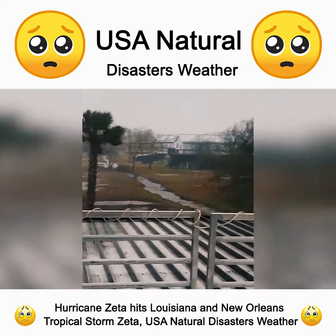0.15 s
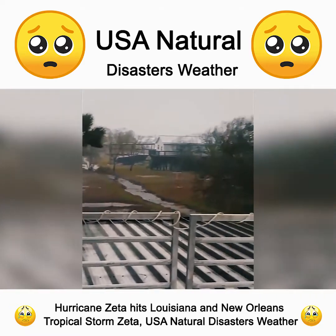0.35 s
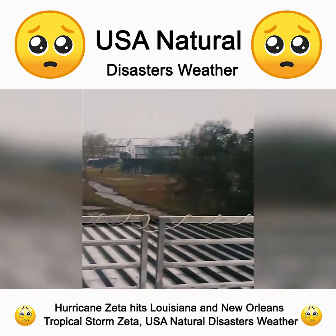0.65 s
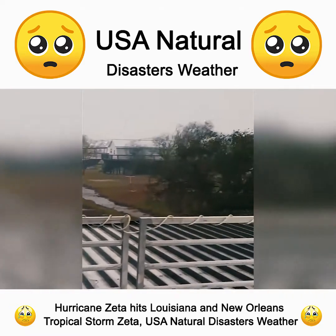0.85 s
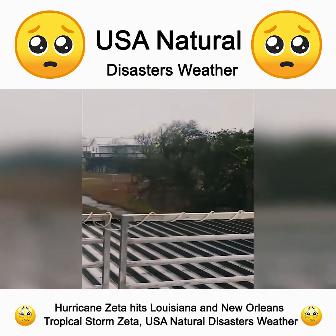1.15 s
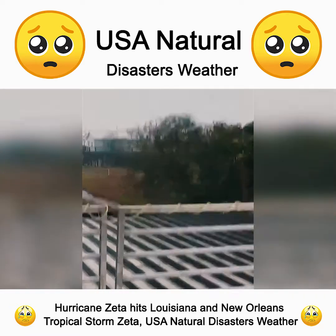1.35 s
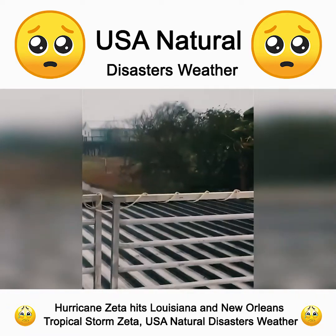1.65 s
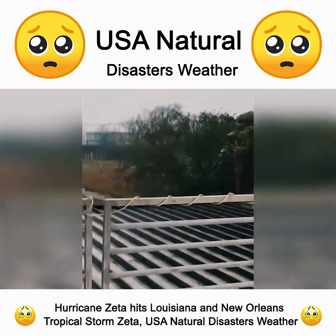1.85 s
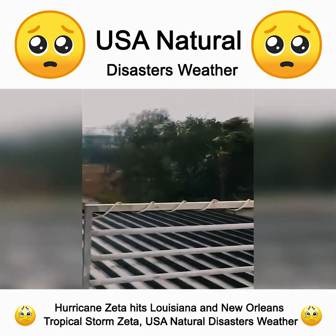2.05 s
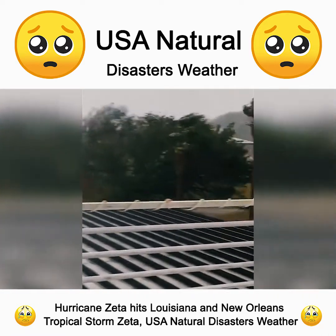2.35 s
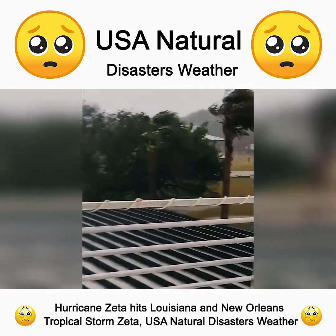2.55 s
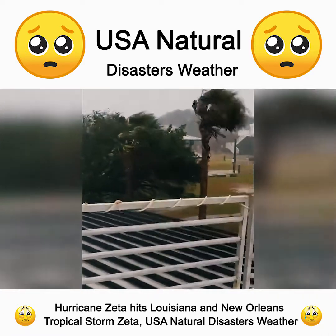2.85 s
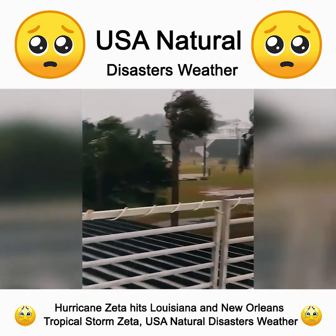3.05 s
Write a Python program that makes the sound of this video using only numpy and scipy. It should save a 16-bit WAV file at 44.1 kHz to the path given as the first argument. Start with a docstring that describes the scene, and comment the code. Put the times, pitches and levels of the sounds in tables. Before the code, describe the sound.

Strong storm wind on an open deck roars into a phone microphone with low rumble and dense buffets; one sharp, loud knock lands early, then the wind eases to a lull and surges again.

```python
"""Storm wind on an open deck, heard through a phone: broad coloured noise roars over a faint hiss of trees.
At first a low rumble of turbulence and a crowd of hard buffets, short puffs of noise, hit the microphone.
Among them, at 0.22 s, one sharp knock close by drops at once from a click into a low thud.
A very faint trace of high noise comes and goes around 0.23 s.
The roar then eases to a lull near 2 s, with fewer buffets, and swells again to its strongest at the end."""
import sys
import numpy as np
from scipy import signal
from scipy.fft import rfft, irfft
from scipy.io import wavfile
from scipy.ndimage import uniform_filter1d

SR = 44100
rng = np.random.default_rng(int(sys.argv[2]) if len(sys.argv) > 2 else 0)


def to_wav(s):
    """Save 16-bit WAV."""
    ch = np.atleast_2d(s).T  # columns
    pcm = np.round(np.clip(ch, -1, 1) * 32767)  # PCM
    wavfile.write(sys.argv[1], SR, pcm.astype(np.int16))


N = 141120  # samples: 3.2 s
TIME_S = np.arange(N) / SR
FREQ_HZ = np.fft.rfftfreq(N, 1 / SR)


def undb(db):
    """Decibels to gain."""
    return 10 ** (np.asarray(db) / 20)


def level_over_time(rows):
    """Gain at every sample, in straight dB lines between (t/s, level/dB) points."""
    time_s, level_db = np.array(rows, float).T
    return undb(np.interp(TIME_S, time_s, level_db))


def over_pitch(rows):
    """Value at every frequency, in straight lines over log pitch between (f/Hz, value) points."""
    hz, value = np.array(rows, float).T
    return np.interp(np.log(np.maximum(FREQ_HZ, 1)), np.log(hz), value)


def noise(gain):
    """Noise of rms 1, shaped by a gain per frequency."""
    x = irfft(rfft(rng.standard_normal(N)) * gain, N)
    return x / x.std()


def flutter(rate_hz, depth_db):
    """A gain that wanders at random by an rms depth in dB, weakening smoothly above the rate."""
    return undb(depth_db * noise(1 / (1 + (FREQ_HZ / rate_hz) ** 2)))


def burst(x, at_s, length_s):
    """A bell-shaped piece of x, scaled to a bell-weighted rms of 1 before shaping."""
    bell = np.exp(-2 * ((TIME_S - at_s) / length_s) ** 2)
    return x * bell * np.sqrt(np.sum(bell ** 2) / np.sum((x * bell) ** 2))


# likeness of left and right: [f/Hz, coherence, phase by which left leads/rad]
STEREO_LIKENESS = [(540,1,0),(740,.99,0),(900,.88,-.15),(1050,.62,-.1),(1170,.35,.6),(1300,.45,2.1),(1550,.6,2.7),(1900,.72,2.9),(2500,.7,3.0),(2900,.4,2.6),(3400,.3,1.3),(4400,.6,.3),(5400,.95,0)]


def wide_noise(colour):
    """Stereo noise of rms 1: alike in the bass, partly opposed in the upper middle."""
    gain = undb(over_pitch(colour))
    likeness = np.array(STEREO_LIKENESS)
    coherence = np.clip(over_pitch(likeness[:, [0, 1]]), -1, 1)
    lead = over_pitch(likeness[:, [0, 2]])
    # the sum and difference of two independent noises set the coherence
    shared = rfft(rng.standard_normal(N)) * gain * np.sqrt(1 + coherence)
    apart = rfft(rng.standard_normal(N)) * gain * np.sqrt(1 - coherence)
    left = (shared + apart) * np.exp(.5j * lead)
    right = (shared - apart) * np.exp(-.5j * lead)
    x = irfft(np.array([left, right]), N)
    return x / x.std()


# strength of the roar's body, before the overall lift: [t/s, level/dB]
GUST_BODY = [(0,-43.5),(.4,-44),(.7,-47.5),(.92,-45.5),(1.15,-45),(1.5,-46),(1.85,-48),(2.04,-48.5),(2.25,-39),(2.55,-37),(2.85,-37),(3.2,-33.5)]
# strength of the roar's treble, before the overall lift: [t/s, level/dB]
GUST_TREBLE = [(0,-40),(.4,-42.5),(.7,-45),(1.2,-43.3),(1.48,-47.5),(1.6,-45.5),(1.83,-49.5),(2.03,-47.5),(2.2,-44),(2.4,-44.5),(2.55,-39),(2.76,-38),(2.88,-40.5),(3.05,-37.5),(3.2,-38)]
# relative colour of the rushing air: [f/Hz, level/dB per Hz]
ROAR_COLOUR = [(40,-25.5),(90,-13),(150,-1.5),(230,-3.5),(330,0),(470,-3),(650,-3),(800,-4),(1100,-5.3),(1500,-9.5),(1900,-16),(2400,-48),(3500,-63.5),(6000,-78.5),(10000,-100.5)]
ROAR_LIFT_DB = 5.5
ROAR_FLUTTER_HZ, ROAR_FLUTTER_DB = 44.4, 0.74
WAVER_HZ, WAVER_DB = 4.2, 1.5  # slow wandering of each half-octave alone


def roar():
    """The broad rush of air follows the gust and flutters; its half-octaves swell and sink separately."""
    spectrum = rfft(wide_noise(ROAR_COLOUR))
    # half-octave steps up from 100 Hz; the end bands also take all that lies beyond them
    step = np.clip(2 * np.log2(np.maximum(FREQ_HZ, 1) / 100), 0, 8)
    body, treble = level_over_time(GUST_BODY), level_over_time(GUST_TREBLE)
    air = 0
    for k in range(9):
        treble_share = np.clip((k - 3) / 4, 0, 1)
        overlap = np.maximum(1 - abs(step - k), 0)
        band = irfft(spectrum * overlap, N)
        strength = body ** (1 - treble_share) * treble ** treble_share
        air = air + band * strength * flutter(WAVER_HZ, WAVER_DB)
    return air * undb(ROAR_LIFT_DB) * flutter(ROAR_FLUTTER_HZ, ROAR_FLUTTER_DB)


# eddies that strike the microphone: [centre t/s, length t/s, level/dB, upper edge f/Hz]
EDDY_HITS = [(.022,0.018,-37,200),(0.042,0.0057,-23.5,736),(.053,.0058,-35,400),(0.105,0.022,-21,480),(.17,0.022,-30,450),(0.207,0.0076,-26,300),(0.292,0.012,-28,447),(0.324,0.015,-22.5,650),(0.337,0.0095,-20.5,200),(0.344,0.0023,-21.5,850),(.35,0.0041,-22,250),(0.362,0.0039,-30,750),(0.38,.01,-30.5,450),(0.395,0.0061,-21,800),(0.427,0.0095,-22,600),(0.517,0.034,-27.5,129),(.551,0.025,-31,656),(0.613,0.014,-28.5,860),(0.635,0.012,-34,120),(0.703,0.009,-27,200),(0.744,0.023,-37,130),(0.788,0.016,-33,110),(0.842,0.02,-29,120),(.981,0.0047,-24,800),(1.123,.007,-28,1290),(1.214,0.01,-33.5,400),(1.263,0.012,-27,400),(1.515,0.042,-35.5,330),(1.769,0.015,-36,160),(2.146,0.018,-40,500),(2.278,0.04,-35.5,400),(2.423,0.017,-23,550),(2.694,.018,-28,146),(2.996,0.018,-24.5,283),(3.08,0.032,-31.5,300),(3.141,.03,-27,260)]
# relative colour of an eddy, before its upper edge is rolled off: [f/Hz, level/dB per Hz]
EDDY_COLOUR = [(25,-25),(45,-8),(70,3.5),(110,4),(155,2),(220,-3.5),(400,-6),(1000,-9.5),(1500,-23),(3000,-60.5)]


def buffets():
    """Each eddy striking the microphone is a short puff of noise, dulled above its own upper edge."""
    colour = undb(over_pitch(EDDY_COLOUR))
    out = 0
    for at_s, length_s, level_db, edge_hz in EDDY_HITS:
        below_edge = 1 / np.sqrt(1 + (FREQ_HZ / edge_hz) ** 6)
        puff = burst(noise(colour * below_edge), at_s, length_s)
        out = out + undb(level_db) * puff
    return out


# strength of the turbulence on the microphone: [t/s, level/dB]
RUMBLE_LEVEL = [(0,-24.5),(.15,-37),(.27,-34.5),(.36,-29),(.52,-38),(.66,-41),(.82,-39.5),(.9,-42),(1.2,-38.5),(1.4,-45.5),(1.55,-42.5),(1.85,-47.5),(2.05,-49.5),(2.3,-41.5),(2.55,-40.5),(2.85,-34.5),(3.2,-34.5)]
# relative colour of the turbulence: [f/Hz, level/dB per Hz]
RUMBLE_TONE = [(20,-25.5),(35,-14.5),(55,7),(80,-0.5),(120,-0.5),(170,-3.5),(280,-9),(500,-18.5),(1000,-37),(2000,-77),(6000,-100)]
RUMBLE_FLUTTER_HZ, RUMBLE_FLUTTER_DB = 55, 3


def rumble():
    """Turbulence on the microphone is low, lumpy noise, evened out before it follows its level."""
    lumpy = noise(undb(over_pitch(RUMBLE_TONE))) * flutter(RUMBLE_FLUTTER_HZ, RUMBLE_FLUTTER_DB)
    running_rms = np.sqrt(uniform_filter1d(lumpy ** 2, size=6000))  # over 136 ms
    return lumpy / running_rms * level_over_time(RUMBLE_LEVEL)


# relative colour of the knock's crack: [f/Hz, level/dB per Hz]
CRACK_COLOUR = [(200,-16.5),(700,9.5),(900,0),(1150,8),(1500,-22),(2200,-24),(3200,-48),(5000,-64),(12000,-73)]
KNOCK_S, KNOCK_DB = .2222, -5.2
KNOCK_START_HZ, KNOCK_END_HZ, KNOCK_FALL_S = 820, 145, .0029
KNOCK_ATTACK_S, KNOCK_HOLD_S, KNOCK_DECAY_S = .0014, .0105, .002
KNOCK_ROUGH_HZ, KNOCK_ROUGH_DB = 90, 1.0
THUD_HZ, THUD_DB, THUD_DECAY_S = 54, -13, 0.023  # it decays from the knock's start
CRACK_S, CRACK_LENGTH_S, CRACK_DB = .2225, 0.0025, -16


def knock():
    """A brief crack with a rough thump whose pitch plunges into a lingering thud."""
    age = np.maximum(TIME_S - KNOCK_S, 0)
    plunge_hz = KNOCK_END_HZ + (KNOCK_START_HZ - KNOCK_END_HZ) * np.exp(-(age / KNOCK_FALL_S) ** 2)
    rise = 1 - np.exp(-(age / KNOCK_ATTACK_S) ** 2)
    # the blow hands over to the thud, in pitch and level together
    held = (1 - np.tanh((age - KNOCK_HOLD_S - KNOCK_DECAY_S) / KNOCK_DECAY_S)) / 2
    hz = held * plunge_hz + (1 - held) * THUD_HZ
    blow = undb(KNOCK_DB) * flutter(KNOCK_ROUGH_HZ, KNOCK_ROUGH_DB)
    thud = undb(THUD_DB) * np.exp(-age / THUD_DECAY_S)
    strength = held * blow + (1 - held) * thud
    phase = 2 * np.pi * np.cumsum(hz * (age > 0)) / SR
    thump = np.sin(phase) * rise * strength
    crack = burst(noise(undb(over_pitch(CRACK_COLOUR))), CRACK_S, CRACK_LENGTH_S)
    return thump + undb(CRACK_DB) * crack


# strength of the hiss of the trees: [t/s, level/dB]
TREES_LEVEL = [(0,-59.5),(1,-57),(2.2,-56),(3.2,-55.5)]
# relative colour of the hiss: [f/Hz, level/dB per Hz]
TREES_COLOUR = [(800,-22),(1750,9.5),(2100,10.5),(2500,3.5),(3200,-6),(4000,-11),(5000,-21.5),(6800,-24.5),(9000,-38.5),(12000,-55)]


def trees():
    """The trees are a faint, wide hiss of noise that grows slightly."""
    return level_over_time(TREES_LEVEL) * wide_noise(TREES_COLOUR)


# relative colour of the trace of high noise: [f/Hz, level/dB per Hz]
HIGH_TRACE_COLOUR = [(3000,1),(7000,-9),(10000,-8),(12000,8)]
HIGH_TRACE_S, HIGH_TRACE_LENGTH_S, HIGH_TRACE_DB = .229, .015, -71


def high_trace():
    """A very faint, bell-shaped burst of high noise."""
    high_noise = noise(undb(over_pitch(HIGH_TRACE_COLOUR)))
    return undb(HIGH_TRACE_DB) * burst(high_noise, HIGH_TRACE_S, HIGH_TRACE_LENGTH_S)


def scene():
    """Roar and tree hiss are wide; all the rest is in the centre."""
    return roar() + buffets() + rumble() + knock() + trees() + high_trace()


def record(dry):
    """The phone cuts the top steeply, above 12.4 kHz."""
    low_pass = signal.ellip(8, .2, 70, 12400, fs=SR, output="sos")  # .2 dB ripple, 70 dB rejection
    return signal.sosfilt(low_pass, dry)


dry = scene()
out = record(dry)
to_wav(out)
```